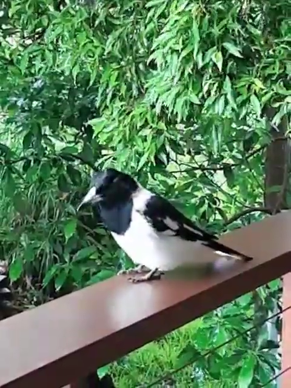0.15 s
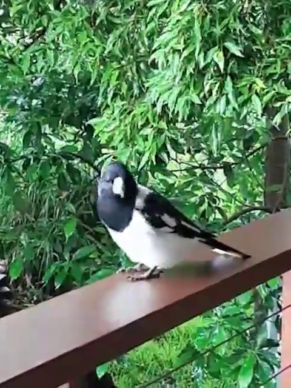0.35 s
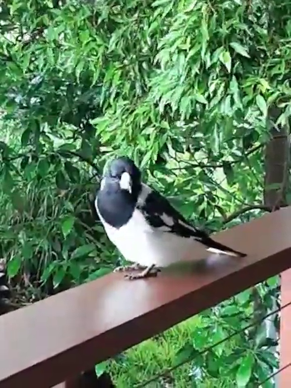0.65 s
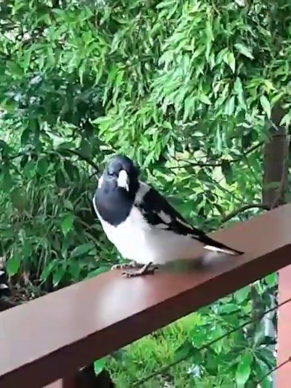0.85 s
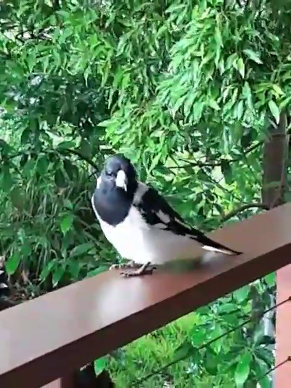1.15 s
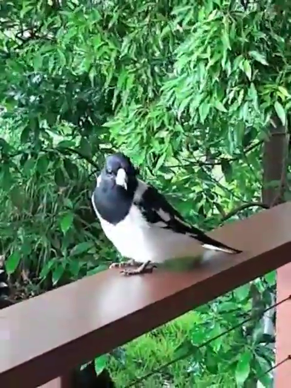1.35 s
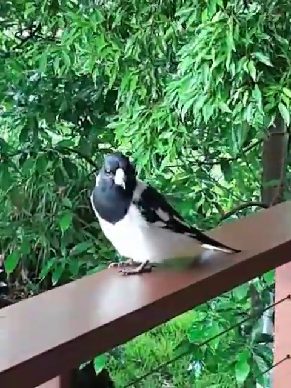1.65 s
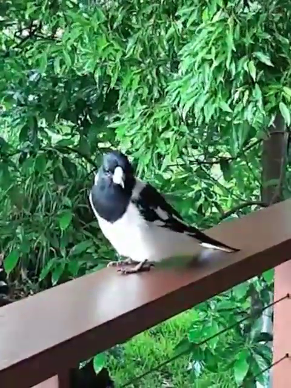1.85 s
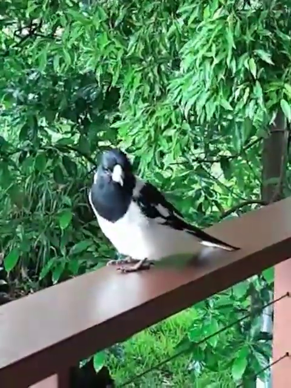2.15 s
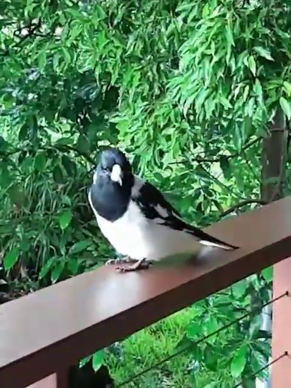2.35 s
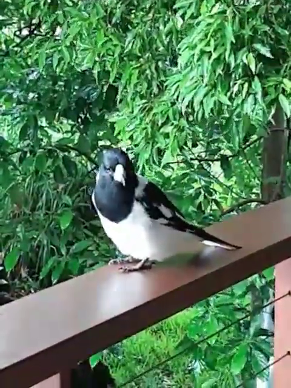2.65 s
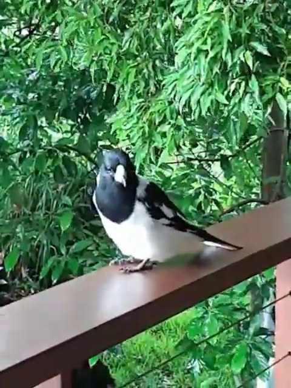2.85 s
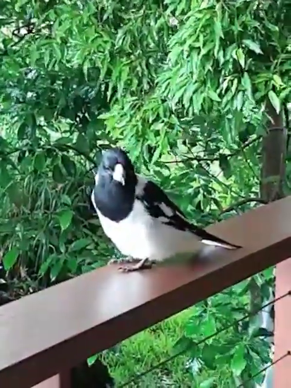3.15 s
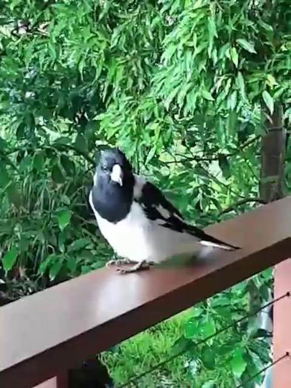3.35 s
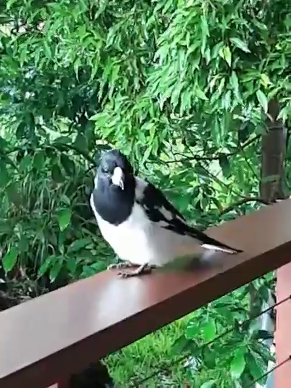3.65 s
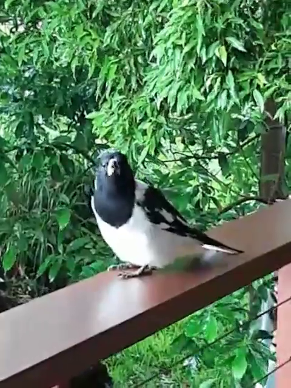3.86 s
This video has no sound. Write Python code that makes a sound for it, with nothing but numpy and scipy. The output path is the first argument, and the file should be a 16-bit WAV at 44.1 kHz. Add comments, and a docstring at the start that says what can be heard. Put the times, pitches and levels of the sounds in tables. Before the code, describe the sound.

At first there is only a low outdoor rumble and hiss with a few soft bass bumps. Then a bird sings five short, nearly pure whistles with a slight veranda echo, finishing on a high, slightly raspy chip.

```python
"""Outdoor rumble and hiss run throughout, with a soft bump of bass now and then.
After two seconds a pied butcherbird on a veranda rail whistles five soft, nearly pure notes,
each thrown back by the deck, wall and roof; a faint tick falls after the second.
The bird ends on a sharp high chip: a falling tone beats against a steady high one,
which repeats more faintly about 30 ms later, under a short breathy rasp."""
import sys
import numpy as np
from scipy import signal
from scipy.fft import rfft, irfft
from scipy.io import wavfile
from scipy.ndimage import uniform_filter1d

SR = 44100
rng = np.random.default_rng(int(sys.argv[2]) if len(sys.argv) > 2 else 0)


def generate_wav(sig):
    """Save sig (samples, or channels by samples) to the path in sys.argv[1] as 16-bit PCM at SR."""
    pcm = np.round(np.clip(np.atleast_2d(sig).T, -1, 1) * 32767).astype(np.int16)
    wavfile.write(sys.argv[1], SR, pcm)


N = 176400
TIME = np.arange(N) / SR
FREQS = np.fft.rfftfreq(N, 1 / SR)


def amp(db):
    """Decibels to gain."""
    return 10 ** (np.asarray(db) / 20)


def unit(x):
    """Scales to rms 1."""
    return x / np.sqrt(np.mean(x ** 2) + 1e-20)


def noise(spectrum):
    """Noise of rms 1, shaped by a gain at each frequency."""
    return unit(irfft(rfft(rng.standard_normal(N)) * spectrum, N))


def eq(points):
    """An EQ curve as gain, drawn on a log-frequency axis."""
    hz, db = np.transpose(points)
    return amp(np.interp(np.log(FREQS + 1), np.log(hz), db))


def fader(points):
    """A level ride as gain over time."""
    return amp(np.interp(TIME, *np.transpose(points)))


# Tone of the two beds. Each row: frequency in Hz, relative level in dB.
RUMBLE_EQ = [(20, -38), (40, -24.5), (62, -20.5), (90, -6.5), (135, 0), (190, -1.5), (250, 1.5),
             (330, -3.5), (410, -5), (520, -2.5), (680, 0.5), (950, -0.5), (1400, -0.5), (1900, -3),
             (2150, -6.5), (2500, -13), (3300, -24), (6000, -47)]
HISS_EQ = [(1500, -19.5), (2600, -0.5), (3000, 0), (3350, -0.5), (4050, 4), (4600, 1.5), (5100, -1.5),
           (6400, -.5), (7200, .5), (7750, -1), (8100, -9), (8500, -17.5), (9600, -15), (11300, -14),
           (13500, -19.5), (15700, -20.5)]
# Their slow rise and fall. Each row: time in seconds, gain in dB.
RUMBLE_RIDE = [(0, -1.4), (.25, 1.5), (.48, -1.5), (.97, 0.8), (1.15, -0.8), (1.38, 0), (1.7, -0.75),
               (2.35, -0.1), (2.48, 2.6), (2.7, 0.1), (3.25, 0.5), (3.5, -.8), (4, 0.3)]
HISS_RIDE = [(0, .2), (.8, -.5), (1.7, -1), (2.5, 0.7), (3.2, 0.2), (4, -.5)]
# Steady drones. Each row: centre in Hz, half-width in Hz, level in dB.
RESONANCES = [(1529, 73, -54), (2034, 38, -59.5)]

def background(rumble_db=-45.5, hiss_db=-52, patch_db=1.0):
    """Distant rumble and hiss with two narrow resonances, gently patchy."""
    bed = amp(rumble_db) * fader(RUMBLE_RIDE) * noise(eq(RUMBLE_EQ))
    bed += amp(hiss_db) * fader(HISS_RIDE) * noise(eq(HISS_EQ))
    for centre, width, db in RESONANCES:
        bed += amp(db) * noise(1 / (1 + ((FREQS - centre) / width) ** 2))
    bands = signal.stft(bed, nperseg=1024, noverlap=768)[2]
    patches = rng.standard_normal(bands.shape)
    for axis in (0, 1):  # blur across frequency, then time
        patches = uniform_filter1d(patches, size=12, axis=axis)
    return signal.istft(bands * amp(patch_db * unit(patches)), nperseg=1024, noverlap=768)[1][:N]


# Low bumps. Each row: time of the peak in seconds, level in dB.
BUMP_CUES = [(.14, -53), (.41, -52.5), (1.31, -49), (2.85, -48), (3.67, -53.5)]
# Their dull tone. Each row: frequency in Hz, relative level in dB.
BUMP_EQ = [(20, -55), (60, -25), (100, -8), (140, -0.5), (260, -1), (400, -16), (900, -42)]

def bumps(swell_s=0.033):
    """Brief, soft swells of bass in the rumble."""
    swells = sum(amp(db) * np.exp(-((TIME - peak) / swell_s) ** 2) for peak, db in BUMP_CUES)
    return swells * noise(eq(BUMP_EQ))


def whistle(note, overtones, halo_db=-16, halo_width_hz=330, linger_s=0.019, edge_s=0.0025):
    """A nearly pure tone that follows one note's pitch and level, in a halo of noise."""
    times, hz, db = np.transpose(note)
    waver = 0.0052 * noise(np.exp(-(2 * FREQS * 0.0041) ** 2))  # half a percent, over about 4 ms
    pitch = uniform_filter1d(np.interp(TIME, times, hz), size=130) * (1 + waver)
    phase = 2 * np.pi * np.cumsum(pitch) / SR
    gate = np.clip(1 + np.minimum(TIME - times[0], times[-1] - TIME) / edge_s, 0, 1)
    level = uniform_filter1d(gate * amp(np.interp(TIME, times, db)), size=130)
    tone = np.sin(phase) + sum(amp(gain_db) * np.sin(round(k) * phase) for k, gain_db in overtones)
    # A narrow halo of noise around the pitch, lingering briefly.
    release = np.exp(-1 / (linger_s * SR))
    halo_level = signal.lfilter([1 - release], [1, -release], level + 1e-12)
    skirt = 1 / (1 + (FREQS / halo_width_hz) ** 2)
    halo = (noise(skirt) * np.sin(phase) + noise(skirt) * np.cos(phase)) / np.sqrt(2)
    return level * tone + amp(halo_db) * halo_level * halo


# The five notes as sung. Each row: time in seconds, pitch in Hz, level in dB.
LOW_WHISTLE = [(2.160, 1005, -49), (2.176, 997, -30), (2.190, 983, -23.5), (2.201, 975, -29),
               (2.209, 965, -52), (2.217, 990, -50), (2.224, 995, -32), (2.260, 1000, -38),
               (2.269, 1004, -50)]
FALLING_SLUR = [(2.477, 1886, -44), (2.488, 1798, -20.5), (2.497, 1699, -35), (2.506, 1720, -35),
                (2.515, 1758, -30), (2.523, 1850, -34), (2.532, 1630, -33), (2.537, 1614, -19),
                (2.544, 1526, -17), (2.55, 1494, -31), (2.561, 1484, -23), (2.574, 1426, -34),
                (2.604, 1440, -32), (2.626, 1375, -32), (2.645, 1330, -32), (2.653, 1290, -45)]
HELD_WHISTLE = [(2.822, 1860, -46), (2.833, 1864, -32.5), (2.847, 1885, -31), (2.862, 1845, -15.5),
                (2.874, 1768, -19), (2.893, 1752, -26), (2.910, 1795, -19.5), (2.923, 1832, -24.5),
                (2.930, 1810, -47)]
SHORT_WHISTLE = [(3.183, 1860, -46), (3.189, 1855, -27), (3.195, 1856, -21), (3.204, 1808, -21),
                 (3.212, 1775, -20), (3.218, 1716, -39), (3.234, 1665, -31)]
RISING_SLUR = [(3.655, 1880, -46), (3.666, 1820, -33), (3.671, 1640, -37), (3.676, 1510, -30),
               (3.682, 1503, -35), (3.692, 1547, -25), (3.696, 1940, -29), (3.701, 2380, -34.5),
               (3.712, 2660, -43), (3.727, 2740, -44), (3.737, 2770, -43), (3.742, 3150, -43),
               (3.750, 3240, -52)]
# Their faint sheen. Each row: harmonic number, level in dB against the fundamental.
SONG_HARMONICS = [(2, -50), (3, -51)]

def song():
    """The bird whistles three clear notes and two rougher slurs with a louder halo of noise."""
    clear = sum(whistle(note, SONG_HARMONICS) for note in (LOW_WHISTLE, HELD_WHISTLE, SHORT_WHISTLE))
    rough = sum(whistle(note, SONG_HARMONICS, halo_db=-8) for note in (FALLING_SLUR, RISING_SLUR))
    return clear + rough


# Slaps off the deck, wall and roof. Each row: delay in seconds, gain in dB.
REFLECTIONS = [(.0055, -16.5), (0.013, -12), (0.0221, -17), (.0290, -17), (0.0386, -24.5)]

def veranda(sound, predelay_s=0.008):
    """Direct sound, a few hard reflections, a short tail and a faint one from the trees."""
    t = TIME[:SR]
    response = np.zeros(SR)
    response[0] = 1
    for delay, db in REFLECTIONS:
        response[round(delay * SR)] += amp(db)
    for db, t60_s in ((-9, 0.22), (-36, 0.5)):  # veranda, trees
        tail = rng.standard_normal(SR) * (t > predelay_s) * amp(-60 * t / t60_s)
        response += amp(db) * tail / np.linalg.norm(tail)
    return signal.fftconvolve(sound, response)[:N]


# The tick is all top end. Each row: frequency in Hz, relative level in dB.
TICK_EQ = [(6000, -29), (10500, 3), (13000, 3), (15500, -2)]

def tick(start_s=2.747, level_db=-50, decay_s=0.004):
    """One tiny, bright click of fast-dying noise."""
    age = TIME - start_s
    return amp(level_db) * (age > 0) * np.exp(-abs(age) / decay_s) * noise(eq(TICK_EQ))


# The chip's two layers. Each row: time in seconds, pitch in Hz, level in dB.
FALLING_TONE = [(3.792, 4350, -53), (3.798, 4330, -30), (3.804, 4324, -18), (3.808, 4356, -30),
                (3.816, 4233, -19.5), (3.822, 3860, -24), (3.830, 3470, -38), (3.838, 2825, -63),
                (3.850, 2464, -46), (3.864, 2430, -39)]
STEADY_TONE_AND_REPEAT = [(3.805, 4500, -41), (3.810, 4480, -21.5), (3.816, 4437, -22.5),
                          (3.824, 4450, -21), (3.829, 4450, -45), (3.840, 4463, -25), (3.848, 4530, -42)]
# Their brighter edge. Each row: harmonic number, level in dB against the fundamental.
CHIP_HARMONICS = [(2, -35), (3, -46)]

def chip():
    """A falling tone beats against a steady high one, which has a fainter repeat about 30 ms later."""
    return sum(whistle(layer, CHIP_HARMONICS) for layer in (FALLING_TONE, STEADY_TONE_AND_REPEAT))


# The rasp's bright tone. Each row: frequency in Hz, relative level in dB.
RASP_EQ = [(2000, -20), (3500, 0), (5500, -1), (7500, 0), (8600, -16), (15000, -34)]

def rasp(start_s=3.808, length_s=0.062, level_db=-41):
    """A short swell of breathy noise as the chip falls away."""
    progress = np.clip((TIME - start_s) / length_s, 0, 1)
    return amp(level_db) * np.sin(np.pi * progress) * noise(eq(RASP_EQ))


def scene():
    """The outdoor bed, with the bird and the tick echoing on the veranda, in mono."""
    return (background() + bumps() + veranda(song() + tick() + chip() + rasp()))[None]


def record(dry, cutoff_hz=15720):
    """A steep low-pass takes off the very top."""
    lowpass = signal.firwin(1023, cutoff_hz, window=("kaiser", 9), fs=SR)
    return signal.oaconvolve(dry, lowpass[None], "same")


dry = scene()
out = record(dry)
generate_wav(out)
```